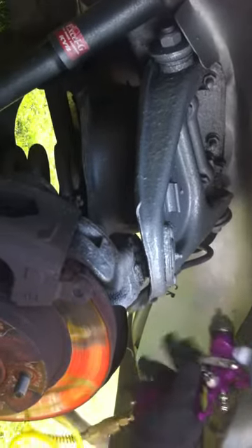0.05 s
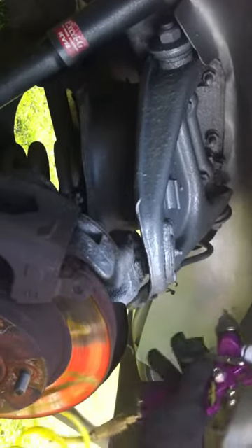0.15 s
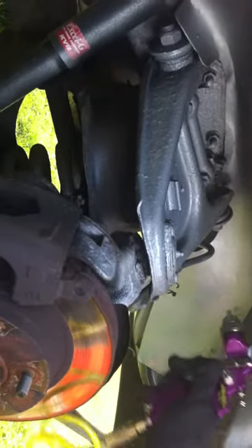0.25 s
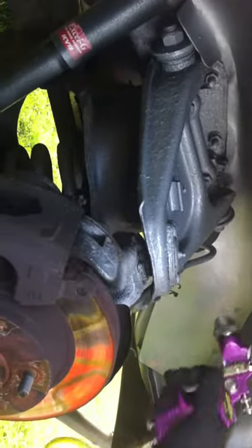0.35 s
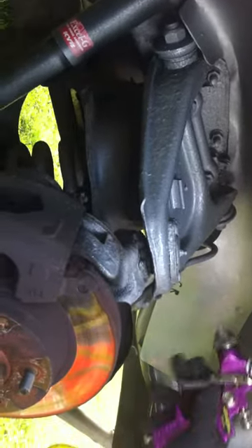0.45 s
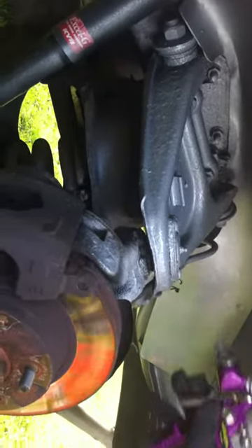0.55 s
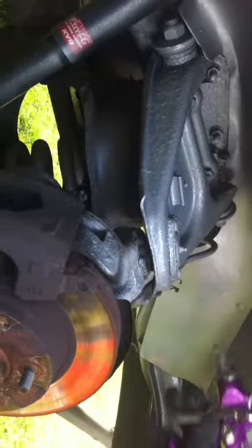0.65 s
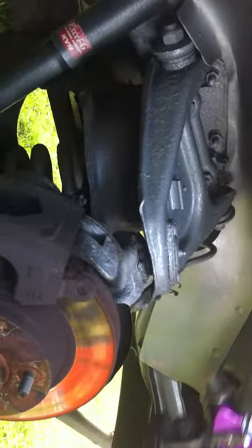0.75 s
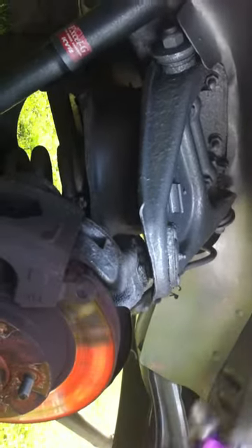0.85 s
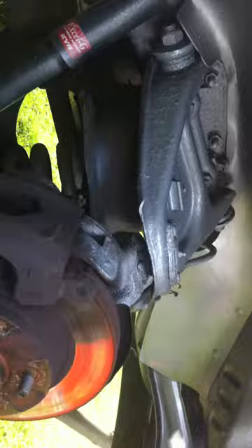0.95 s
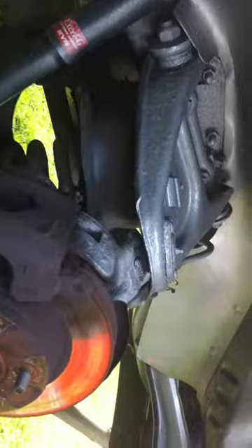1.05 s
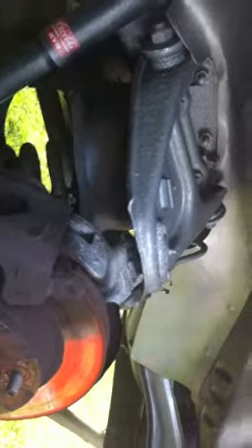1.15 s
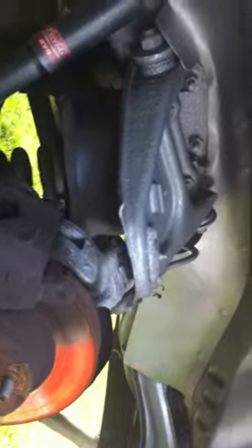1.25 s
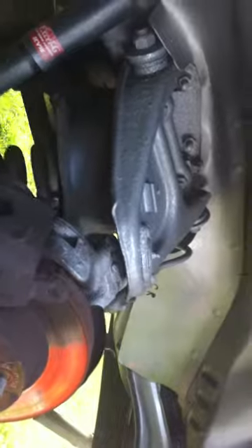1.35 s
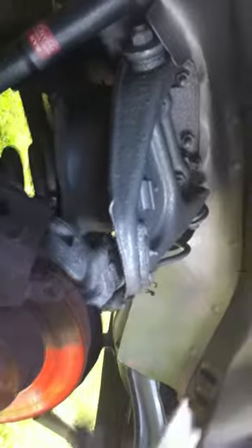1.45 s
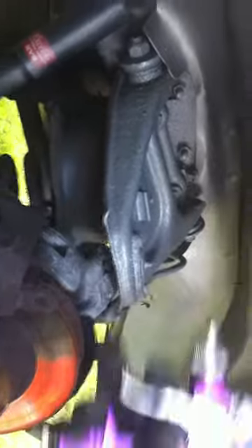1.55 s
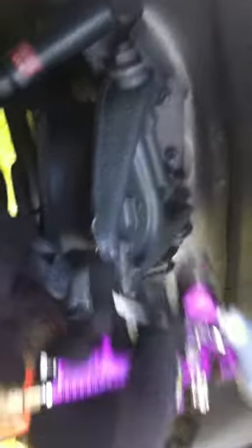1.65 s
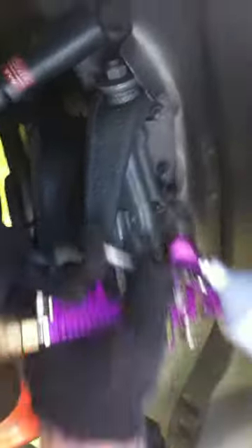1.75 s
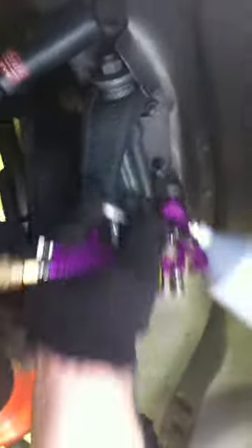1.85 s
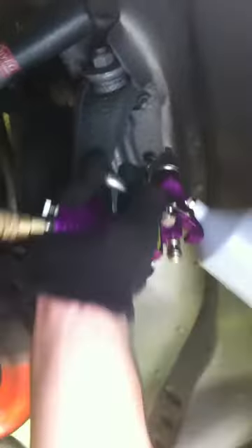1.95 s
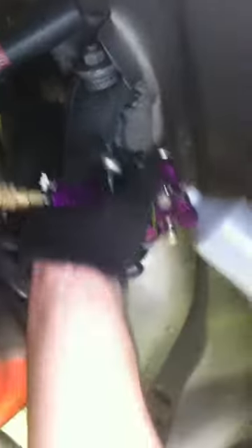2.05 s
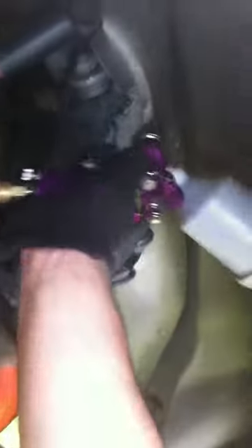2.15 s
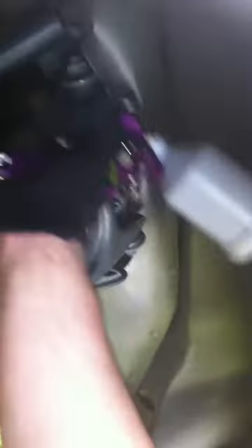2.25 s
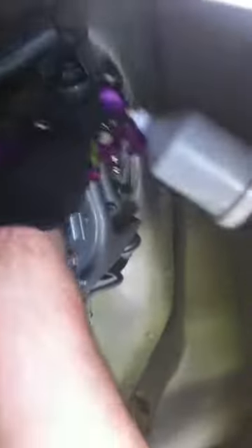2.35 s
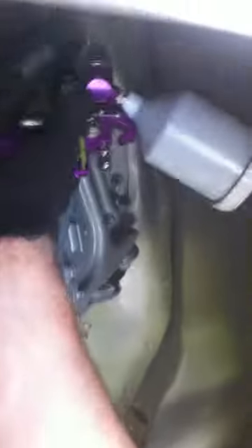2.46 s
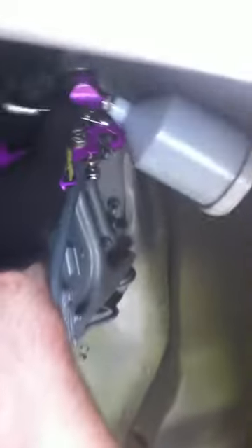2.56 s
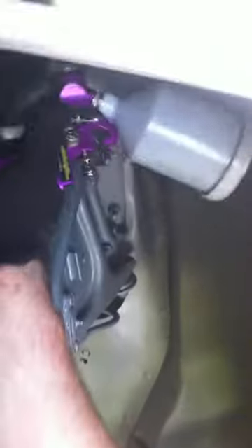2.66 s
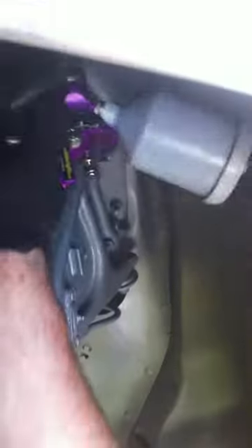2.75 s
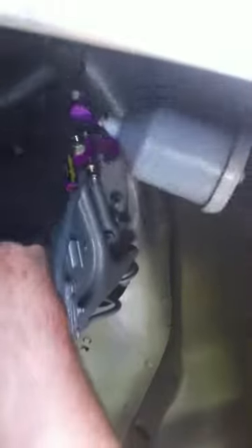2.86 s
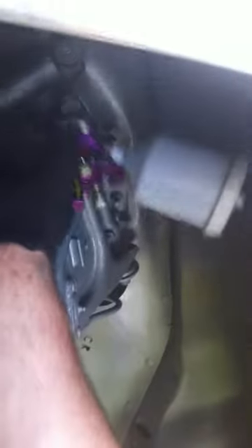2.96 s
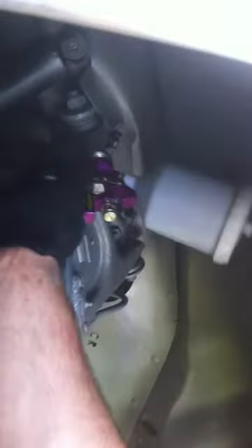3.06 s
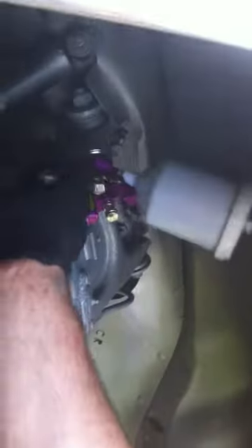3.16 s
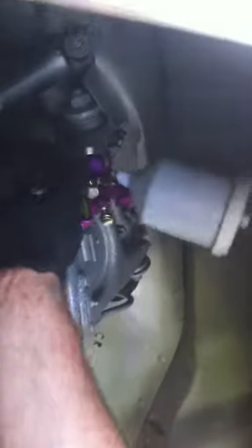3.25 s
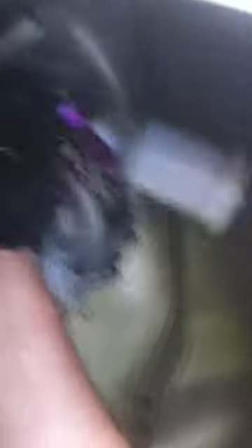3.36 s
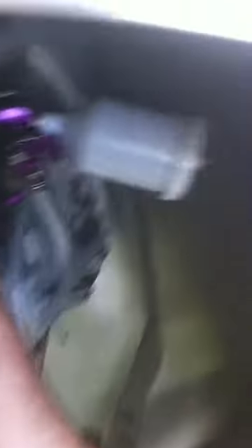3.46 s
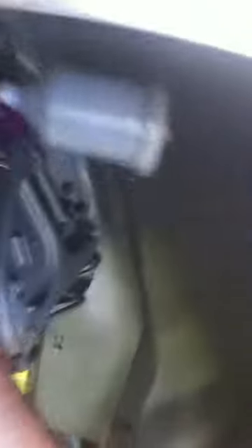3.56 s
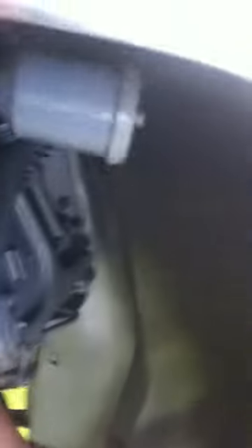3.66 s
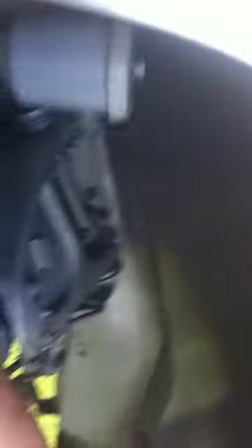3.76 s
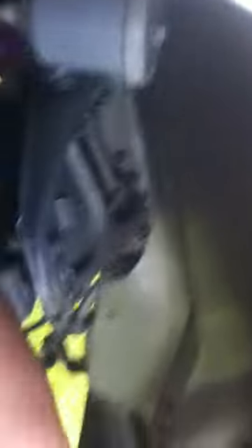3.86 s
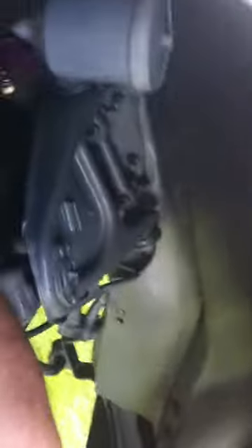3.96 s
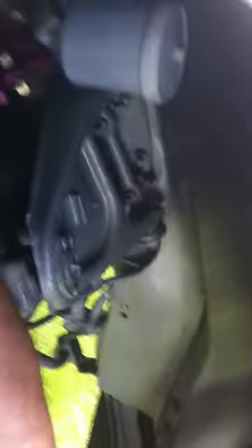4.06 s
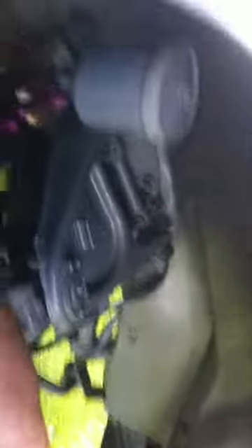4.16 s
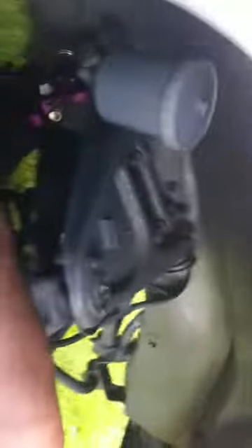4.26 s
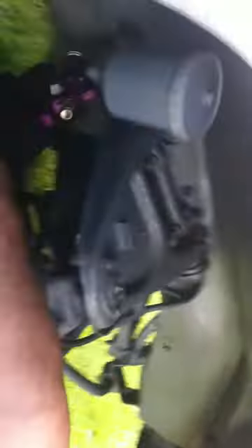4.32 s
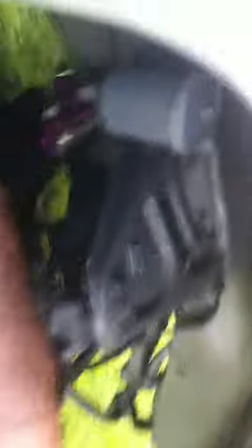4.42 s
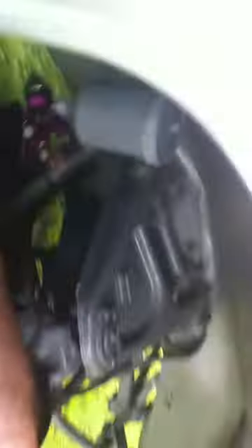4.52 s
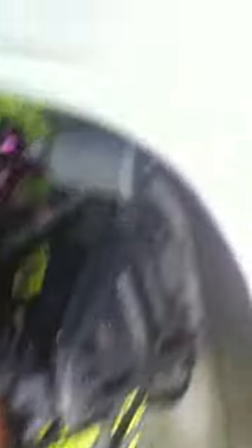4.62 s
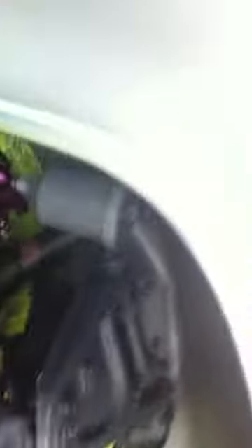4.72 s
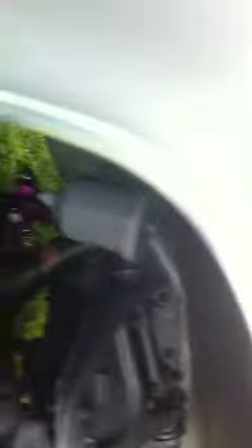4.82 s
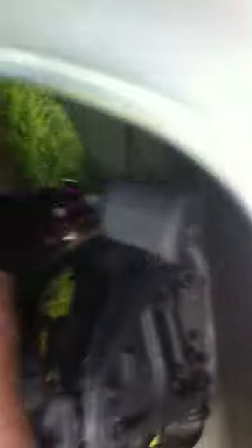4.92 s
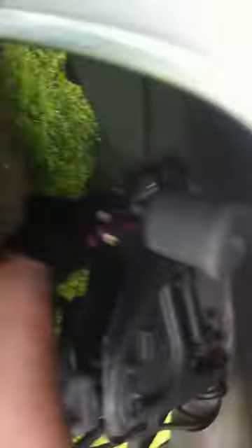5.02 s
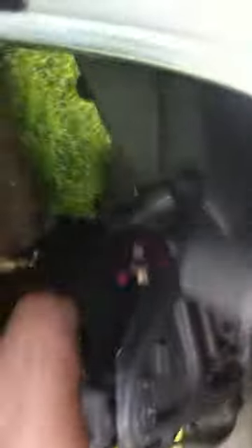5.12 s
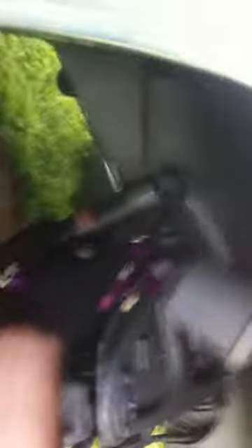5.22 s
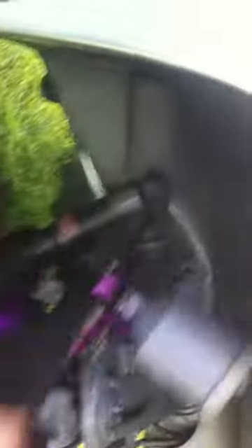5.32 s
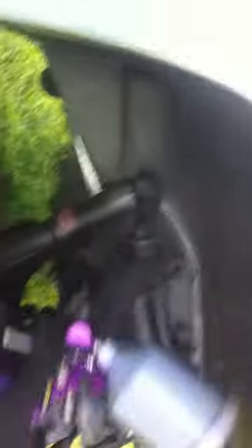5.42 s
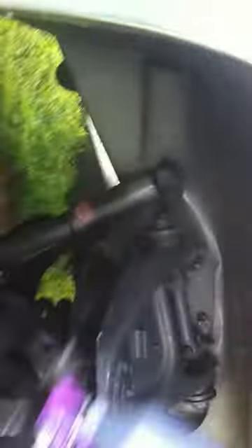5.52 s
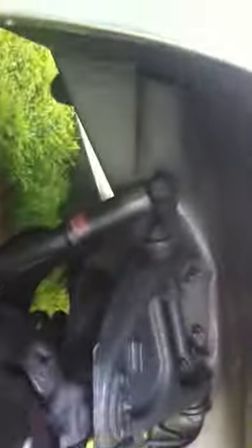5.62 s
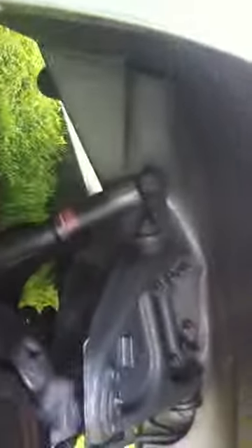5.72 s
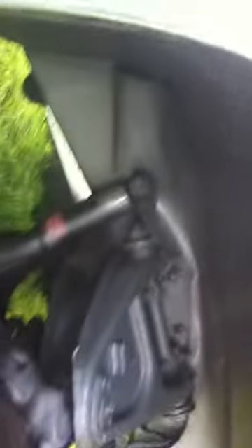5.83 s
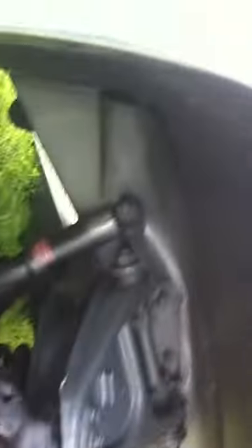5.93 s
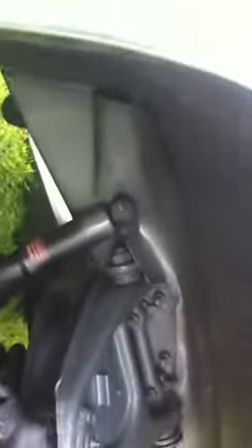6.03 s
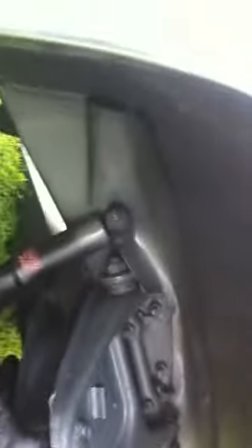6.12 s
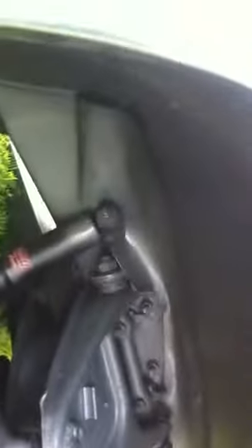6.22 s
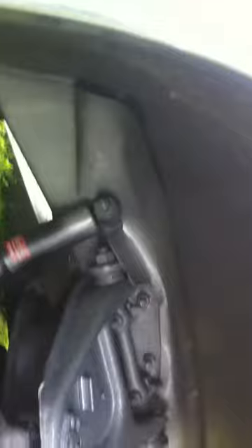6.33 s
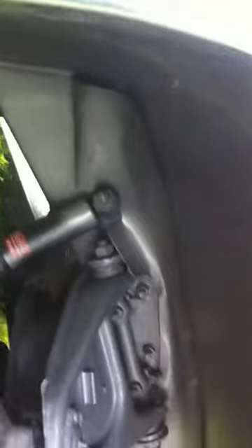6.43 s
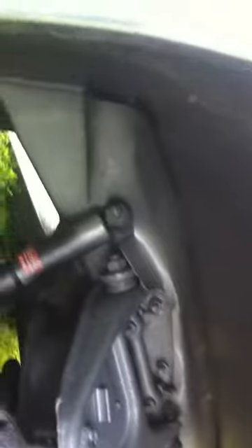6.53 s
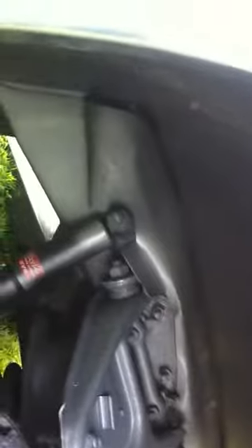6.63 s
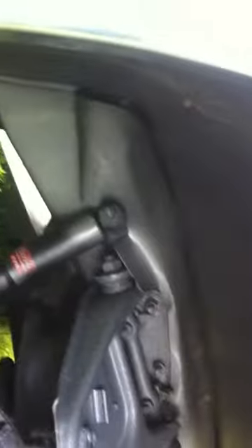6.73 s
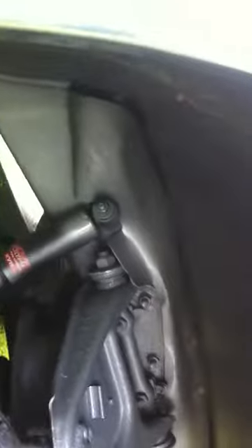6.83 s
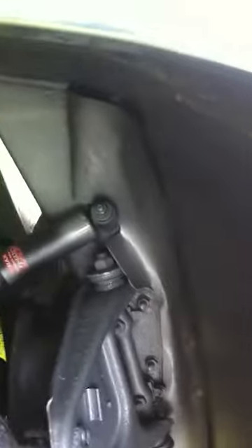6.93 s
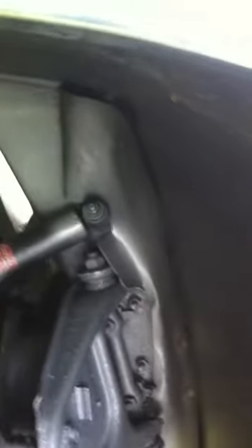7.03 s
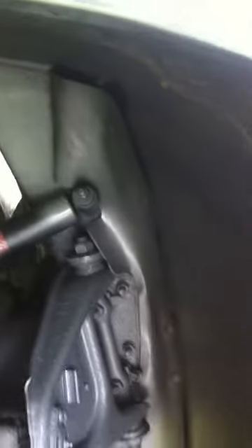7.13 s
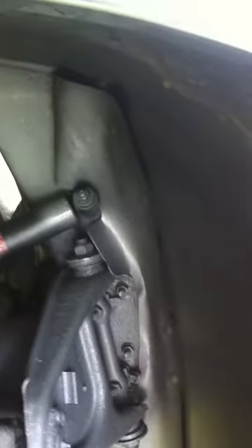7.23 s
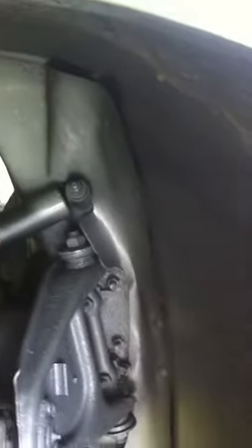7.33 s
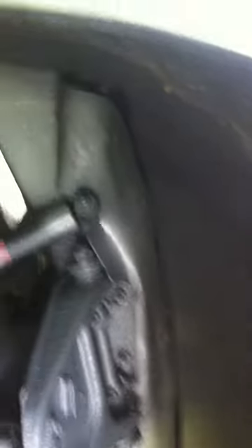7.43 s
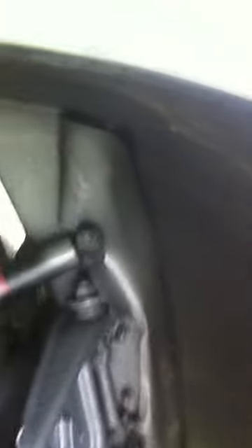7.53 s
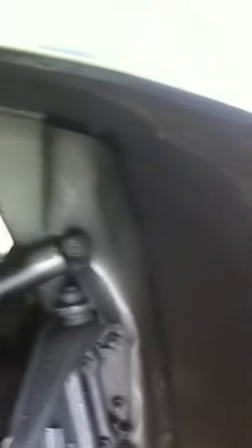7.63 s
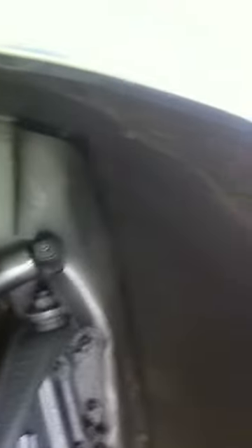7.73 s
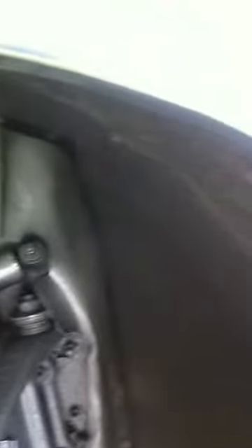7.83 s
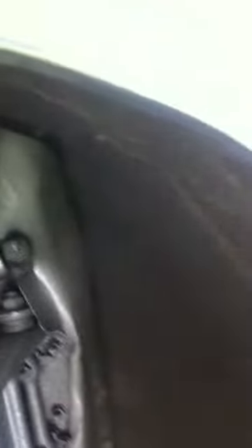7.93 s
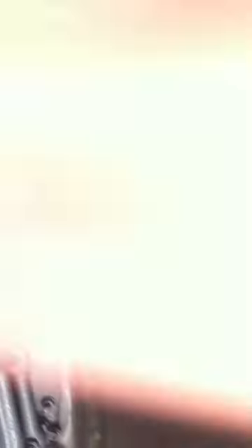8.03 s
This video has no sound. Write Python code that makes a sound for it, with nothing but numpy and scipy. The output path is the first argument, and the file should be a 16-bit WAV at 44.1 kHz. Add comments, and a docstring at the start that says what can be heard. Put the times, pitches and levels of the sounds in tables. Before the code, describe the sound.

Bright, close spray-gun hisses cut over a buzzing low compressor drone that dips under each burst, then a few hard clacks and only the drone.

```python
"""A small piston compressor drones while a spray gun, already open, hisses inside a wheel arch near a phone.
A second short burst follows, then after a pause six longer ones: shaped noise gated by the valve.
A few knocks end the spraying, each a brief swing, and the drone of repeated strokes is left alone.
The arch colours the drone by place as the phone moves; its gain control ducks the drone under each burst
and lets it swell back."""
import sys
import numpy as np
from scipy import signal
from scipy.fft import rfft, irfft
from scipy.io import wavfile
from scipy.ndimage import uniform_filter1d

SR = 44100
rng = np.random.default_rng(int(sys.argv[2]) if len(sys.argv) > 2 else 0)


def generate_wav(signal):
    """Clip the signal to [-1, 1] and save it as 16-bit WAV at the path in sys.argv[1]."""
    frames = np.transpose(np.atleast_2d(signal))
    scaled = np.clip(frames, -1, 1) * 32767
    pcm = np.round(scaled).astype(np.int16)
    wavfile.write(sys.argv[1], SR, pcm)


N = 356310  # length in samples

# Relative spectra of the nozzle hiss, the splash off the part and the low roar.
# Each row: frequency in Hz, density in dB per Hz.
JET_SPECTRUM = [(4400, -48), (7500, -13), (10200, -3), (12400, 2), (14000, -3.5), (15000, -2.5),
                (16500, -7)]
SPLASH_SPECTRUM = [(2800, -22.5), (3800, -8), (5000, -2), (6000, 0), (7200, -4), (9000, -7.5)]
ROAR_SPECTRUM = [(70, -77), (150, 7.5), (320, 9), (430, -0.5), (600, 9), (850, 8.5), (1050, 6), (2000, 0),
                 (3200, 1.5), (5000, -12.5)]
# Trigger pulls. Each row: opens in seconds, let go in seconds, squeeze in seconds, jet level early in dB,
# late in dB, opening surge in dB, splash relative to jet early in dB, late in dB,
# roar relative to splash in dB.
PULLS = [(-.1, 0.182, .01, -17, -4.5, 0, -4, -8.5, -8.5), (.309, 0.568, 0.0082, -9, -8.5, 0, -6, -6, -10),
         (2.231, 2.670, .01, -8.5, -10.5, 4, -8.5, -7, -9),
         (2.762, 3.197, 0.013, -10.5, -8, 3, -10, -6, -7),
         (3.316, 3.784, 0.0082, -8, -9, 3.5, -8.5, -7.5, -7),
         (3.89, 4.318, 0.018, -9.5, -5.5, 10.5, -11, -6.5, -8),
         (4.412, 4.891, .007, -8.5, -9, 1, -6.5, -6.5, -9.5),
         (5.006, 5.282, 0.012, -6, -9.5, -1.5, -8, -4, -9.5)]
CLOSE_S, SURGE_S = 0.013, 0.058  # the valve closes; the hose pressure settles
SWEEP_DB = 2.5  # the splash swells mid-pull as the fan of paint crosses the part
THUD_DB, THUD_HZ = -40, 30  # pressure step as the valve opens or shuts: peak level, low-pass cutoff

# Drone colour in the arch. Each row is one place: relative levels in dB of multiples 1 to 28 of the stroke rate.
PLACES = [(-43.0, -17.5, -9, -19.5, -17.5, -15.0, -15, -20, -22.5, -4.5, -11.5, -13, -2, -6.5, -18, -23, 0.89, -3.5, -16.5, -12, -13, -15.5, -11, -10.5, -18, -24, -45, -31),
          (-44, -14, -7.5, -17, -14, -7.5, -13, -18, -15.5, -5, -14, -14.5, -6, -1, -13, -11.5, 1, -3, -11, -10.5, -14.5, -19.5, -3, -14, -13.5, -24, -48, -24.5),
          (-42, -15, -7.5, -19, -14.5, 0, -8, -11, -1.5, 4, -6, -6, -0.5, -4.5, -33, -7.5, -0.31, -12, -11, -6.5, -14.5, -42, -8, -10, -26, -35, -21, -21),
          (-43, -16, -8, -19, -15, -14, -10.5, -22, -8.5, 3, 0, -4.5, -0.5, -1.5, -15.5, -12, 0.8, -4.5, -17.5, -9.5, -13.5, -15, -7.5, -12.5, -15, -47, -21.5, -27)]
# Casing and valve reeds rung by each stroke. Each row: frequency in Hz, width in Hz,
# relative level at the first place in dB, at the last place in dB.
CASING_MODES = [(1716, 90, -34, -28.5), (1803, 45, -28.5, -28.5), (2044, 79, -35.5, -29.5),
                (2330, 70, -39.5, -38.5), (2546, 19, -40, -29.5), (2802, 66, -40.5, -28.5),
                (3316, 45, -32.5, -28), (3510, 115, -35, -34), (3970, 120, -45, -42),
                (5300, 1500, -54, -49.5), (6100, 310, -48, -40.5), (8240, 190, -55, -48),
                (8880, 110, -33, -45.5), (8800, 2250, -42.5, -44)]
# Compressor air hiss, one relative spectrum for the first place and one for the last.
# Each row: frequency in Hz, density in dB per Hz.
INTAKE_SPECTRA = [
    [(1000, -13), (1500, 7), (2200, 4), (3100, -7), (3500, 1.5), (4300, -5), (6100, -3), (7100, -27),
     (7900, -10.5), (9000, 1.5), (9900, -4), (12500, 4), (13800, -4), (15700, -16)],
    [(1000, -17), (1500, -10), (2200, 7.5), (3100, 2), (3500, 3.5), (4500, -1), (6100, -3.5), (6900, -2.5),
     (8200, 2.5), (9100, -7), (10500, -6.5), (12200, -1.5), (13500, -12), (15700, -9)],
]
# Relative spectrum of the motor rumble. Each row: frequency in Hz, density in dB per Hz.
RUMBLE_SPECTRUM = [(20, -36), (70, -62), (110, -6), (200, -1.5), (450, -5.5), (600, 0.5), (1000, -2.5),
                   (1300, -6.5), (1600, -11.5), (3000, -28)]
# Path of the phone. Each row: time in seconds, place from 0 to 3, compressor level in dB.
PATH = [(0, .5, 2), (1, .5, -0.5), (1.8, 0, -1), (2.3, 0, -1.5), (3, 0.84, 1), (3.6, 0.54, 1),
        (4.2, 1.25, 0.5), (4.6, 2, 2), (5, 2, 5), (5.3, 2.5, 0), (5.7, 2.5, 0.5), (6, 2.5, 0.5),
        (6.25, 3, .5), (6.5, 3, 0), (6.8, 3, 0.5), (7.5, 3, 1), (8.08, 3, 1.5)]
# Level of the intake treble. Each row: time in seconds, level change in dB.
TREBLE_LIFT = [(0, -3), (2.2, -4), (3.5, -3), (5.3, 4), (5.8, 1), (5.9, 7), (6.3, 6), (7.6, 4), (7.72, 9.5),
               (8.08, 10)]
# Casing level and intake hiss level. Each column is one place, in dB.
CASING_DB = (-38.5, -39.5, -41.5, -39)
INTAKE_DB = (-41, -40, -38, -42)
STROKE_HZ, FIRST_STROKE_S = 55.503, .0025
DRONE_DB, RUMBLE_DB = -18.5, -34
WHIR_HZ, WHIR_DB = 187.4, -44  # a separate tone beside the drone that wavers a little
INTAKE_FOLLOWS = .5  # share of the compressor's level change in dB that the intake hiss follows

# Gun and cup knock against the metal. Each row: time in seconds, peak level in dB, frequency in Hz,
# length in cycles.
KNOCKS = [(5.2847, 3.5, 2850, 1.3), (5.494, 2.5, 2240, 0.98), (5.4978, -11, 10500, 3.7),
          (5.5305, -27, 11000, 5), (5.5502, -14, 2600, 1.5), (5.5852, -18, 5270, 2.4),
          (5.5853, -15, 11300, 4)]
EDGE_HZ = 15790  # upper band limit


def gain_of(db):
    """Decibel law: 20 dB is a tenfold amplitude."""
    return 10 ** (np.asarray(db) / 20)


def evened(x):
    """Normalisation to unit root-mean-square."""
    return x / np.sqrt(np.mean(x ** 2) + 1e-20)


def read(points, hz):
    """Interpolation of a spectrum, linear in dB over logarithmic frequency."""
    f, value = np.transpose(points)
    return np.interp(np.log(hz + 1), np.log(f + 1), value)


def columns(rows):
    """Linear interpolation in time of each column, sample by sample."""
    s, *values = np.transpose(rows)
    return [np.interp(np.arange(N) / SR, s, v) for v in values]


def noise(spectrum, patchy_db, flicker_db, size=512):
    """Short-time synthesis: random spectra with drifting patches and a flicker shared by all pitches."""
    frames, hz = 4 * N // size + 5, np.fft.rfftfreq(size, 1 / SR)
    real, imaginary, patches = rng.standard_normal((frames, len(hz), 3)).T
    patches = uniform_filter1d(patches, size=7, axis=0)  # across frequency
    patches = evened(uniform_filter1d(patches, size=20, axis=1))  # across time
    flicker = evened(uniform_filter1d(rng.standard_normal(frames), size=5))
    level_db = read(spectrum, hz)[:, None] + patchy_db * patches + flicker_db * flicker
    spectra = (real + 1j * imaginary) * gain_of(level_db)
    return evened(signal.istft(spectra, nperseg=size, noverlap=3 * size // 4)[1][:N])


def gun():
    """Turbulent flow noise: a valve gates the jet, its splash and a low roar, and thuds by its pressure step."""
    valve, jet_db, splash_db, roar_db = np.zeros((4, N))
    for opens, let_go, squeeze, early_db, late_db, surge_db, splash_early_db, splash_late_db, rel_db in PULLS:
        now = slice(max(round(opens * SR), 0), round((let_go + 4 * CLOSE_S) * SR))
        t = np.arange(now.start, now.stop) / SR
        along = np.clip((t - opens) / (let_go - opens), 0, 1)
        opening = np.clip((t - opens) / squeeze, 0, 1) ** 1.1
        closing = np.exp(-(np.maximum(t - let_go, 0) / CLOSE_S) ** 2)
        valve[now] = opening * closing
        surge = surge_db * np.exp((opens - t) / SURGE_S)
        jet_db[now] = early_db + along * (late_db - early_db) + surge
        sweep = SWEEP_DB * np.sin(np.pi * along)
        splash_db[now] = splash_early_db + along * (splash_late_db - splash_early_db) + sweep
        roar_db[now] = rel_db
    splash = noise(SPLASH_SPECTRUM, 1.7, 1.0)
    splash = splash + gain_of(roar_db) * noise(ROAR_SPECTRUM, 1.56, 1.2)
    jet = noise(JET_SPECTRUM, 1.6, 0.81)
    spray = valve * gain_of(jet_db) * (jet + gain_of(splash_db) * splash)
    low_pass = signal.butter(2, THUD_HZ, fs=SR, output="sos")
    thud = signal.sosfilt(low_pass, np.diff(valve, prepend=1))  # the valve starts open
    return spray + gain_of(THUD_DB) * thud / abs(thud).max()


def causal_phases(db):
    """Minimum phase by the Hilbert transform of log level: a sharp stroke, then its ringing."""
    circle_db = np.concatenate([[db[0] - 24], db, np.full(7, db[-1] - 22), db[::-1]])
    log_level = circle_db * np.log(10) / 20
    return -signal.hilbert(log_level).imag[1:len(db) + 1]


def pipe_cycles(size=4096):
    """Fourier series: one full stroke as the pipes sound it at each place."""
    multiple = np.arange(1, len(PLACES[0]) + 1)
    # curved phase: from multiple 10 up, the high ones arrive first and the lower ones trail
    trail = .055 * (np.maximum(multiple, 10) - 17) ** 2
    phases = causal_phases(np.mean(PLACES, axis=0)) + trail
    return [evened(irfft(np.append(0, -gain_of(db) * np.exp(1j * phases)), size)) for db in PLACES]


def casing_cycles(size=8192):
    """Modal resonance: one stroke of the casing at each place, rung by a short clatter of valve parts."""
    hz, t = np.arange(size // 2 + 1) * STROKE_HZ, np.arange(size) / size / STROKE_HZ
    cycles = []
    for along in np.linspace(0, 1, len(PLACES)):
        burst = rng.standard_normal(size) * np.exp(-t / 0.012)
        clatter = np.exp(1j * np.angle(rfft(burst)))  # only its phases are kept
        modes = sum(gain_of(first_db + along * (last_db - first_db)) / (1 + (2 * (hz - f) / width) ** 2)
                    for f, width, first_db, last_db in CASING_MODES)
        cycles.append(evened(irfft(clatter * modes * (hz < SR / 2))))
    return cycles


def repeat(cycles, turns, share):
    """Periodicity: reads the cycles over and over, mixed by their shares."""
    return sum(s * np.interp(turns % 1, np.arange(len(c)) / len(c), c, period=1) for s, c in zip(share, cycles))


def compressor():
    """Near-periodic excitation: uneven strokes ring pipes and casing over rumble, whir and throbbing intake hiss."""
    place, level_db = columns(PATH)
    t = np.arange(N) / SR
    wander = evened(uniform_filter1d(rng.standard_normal(N), size=4000))
    turns = (t - FIRST_STROKE_S) * STROKE_HZ + 0.00052 * wander
    share = np.array([np.maximum(1 - abs(place - k), 0) for k in range(len(PLACES))])

    # each stroke differs in strength and lateness, read smoothly between strokes
    strength, late = rng.standard_normal((round(turns[-1]) + 2, 2)).T
    strength, late = (np.interp(turns + 1, range(len(v)), v) for v in (strength, late))
    drone = (1 + 0.051 * strength) * repeat(pipe_cycles(), turns + 0.0012 * late, share)
    casing = repeat(casing_cycles(), turns, np.sqrt(share))
    casing_db, hiss_db = np.array([CASING_DB, INTAKE_DB]) @ share
    strokes = gain_of(level_db) * (gain_of(DRONE_DB) * drone + gain_of(casing_db) * casing)

    along = np.clip(place / 3, 0, 1)
    first_hiss = noise(INTAKE_SPECTRA[0], 2.5, 0.85)
    last_hiss = noise(INTAKE_SPECTRA[1], 1.9, 0.54)
    hiss = np.sqrt(1 - along) * first_hiss + np.sqrt(along) * last_hiss
    treble = signal.sosfiltfilt(signal.butter(2, 10200, "high", fs=SR, output="sos"), hiss)
    lift_db, = columns(TREBLE_LIFT)
    hiss = gain_of(hiss_db + INTAKE_FOLLOWS * level_db) * (hiss + (gain_of(lift_db) - 1) * treble)

    throb = 1 + 0.05 * np.cos(2 * np.pi * (turns - .2))  # once a stroke
    rumble = gain_of(RUMBLE_DB) * noise(RUMBLE_SPECTRUM, 1.3, 0.42, size=2048)
    whir = gain_of(WHIR_DB) * np.sqrt(2) * np.sin(2 * np.pi * WHIR_HZ * t + .8 * wander)
    return strokes + throb * (hiss + rumble) + whir


def knocks():
    """Impact: each knock is a swing of a few cycles under a Gaussian envelope, with a faint overtone."""
    out, t = np.zeros(N), np.arange(-100, 100) / SR
    for s, db, hz, cycles in KNOCKS:
        overtone = 0.092 * np.sin(2 * np.pi * 2.5 * hz * t)
        envelope = np.exp(-(2 * t * hz / cycles) ** 2)
        swing = -(np.sin(2 * np.pi * hz * t) + overtone) * envelope
        out[round(s * SR) - 100:][:len(t)] += gain_of(db) * swing / abs(swing).max()
    return out


def scene():
    """Superposition: the sources add at one microphone, which feeds both channels."""
    return np.tile(gun() + compressor() + knocks(), (2, 1))


def record(dry, knee_db=-16.5, share=0.82, fall_s=0.0082, rise_s=0.82, start_db=9.5):
    """Compression: gain falls fast on loud sound and recovers slowly; then a low-pass band limit."""
    hop = 220  # samples between gain steps
    power = uniform_filter1d(dry[0] ** 2, size=900)[::hop]
    over_db = share * np.maximum(10 * np.log10(abs(power) + 1e-12) - knee_db, 0)
    cut_db, now_db = [], start_db
    for want_db in over_db:
        settle_s = fall_s if want_db > now_db else rise_s
        now_db += (want_db - now_db) * min(hop / SR / settle_s, 1)
        cut_db.append(now_db)
    ducked = dry / gain_of(np.interp(np.arange(N) / hop, range(len(cut_db)), cut_db))
    band_limit = signal.firwin(1001, EDGE_HZ, window=("kaiser", 7), fs=SR)
    return signal.oaconvolve(ducked, band_limit[None], "same")


dry = scene()
out = record(dry)
generate_wav(out)
```